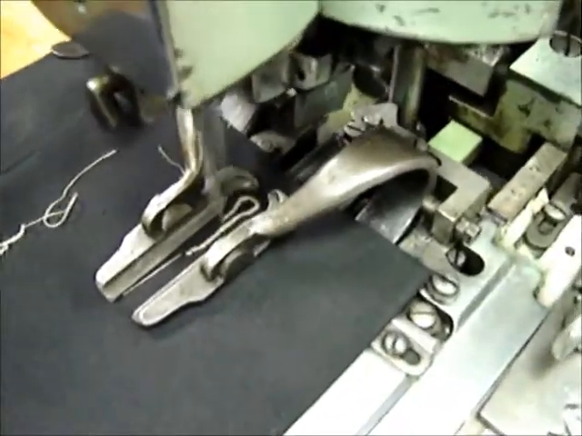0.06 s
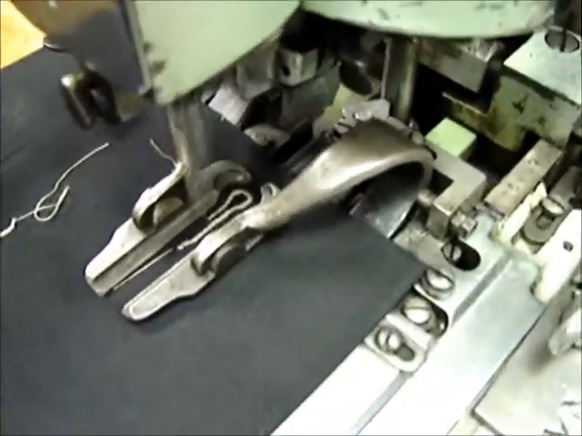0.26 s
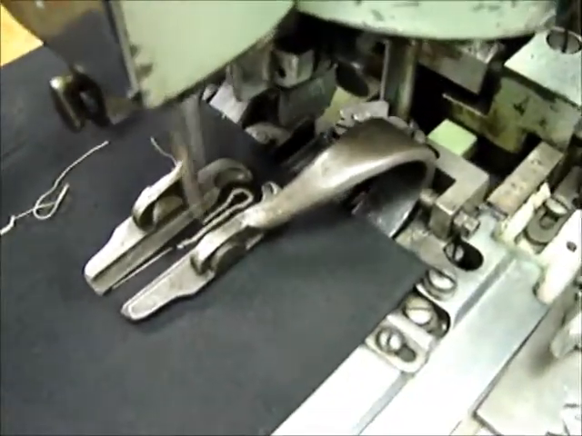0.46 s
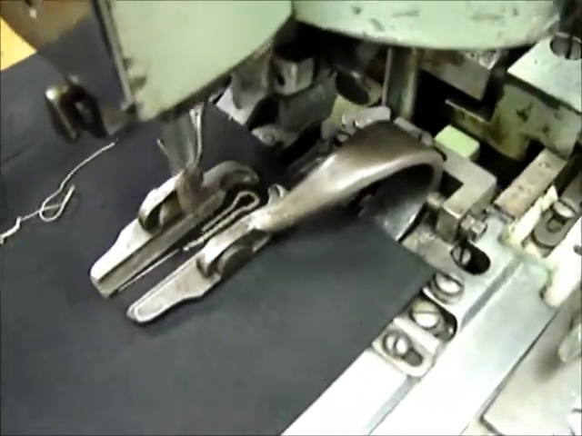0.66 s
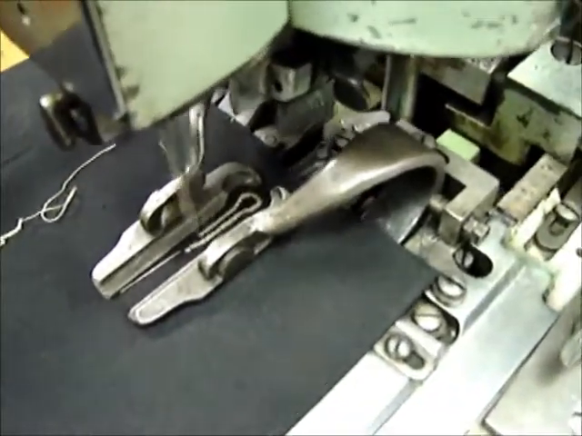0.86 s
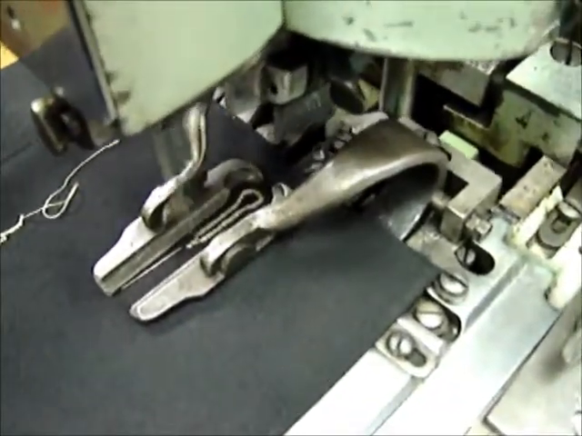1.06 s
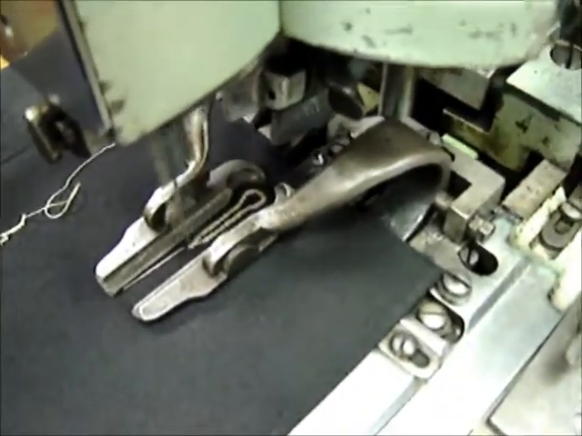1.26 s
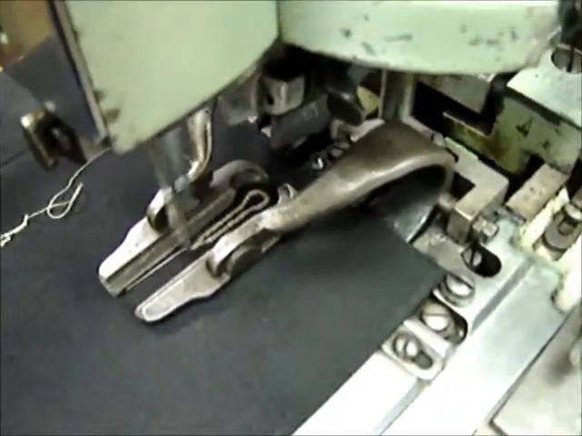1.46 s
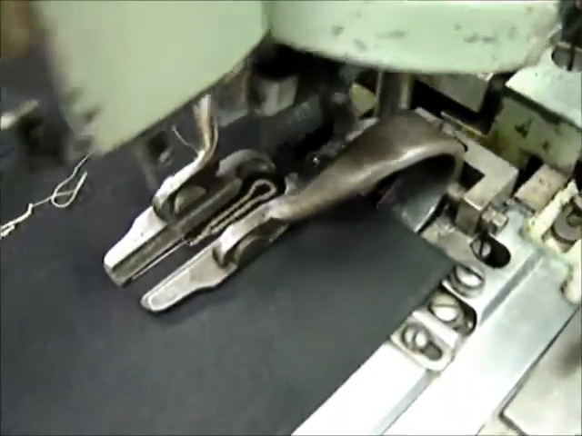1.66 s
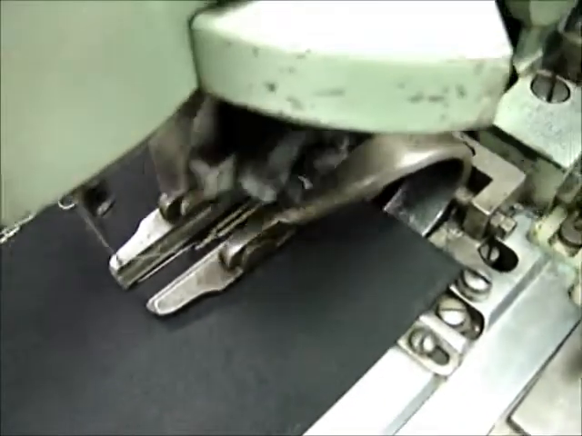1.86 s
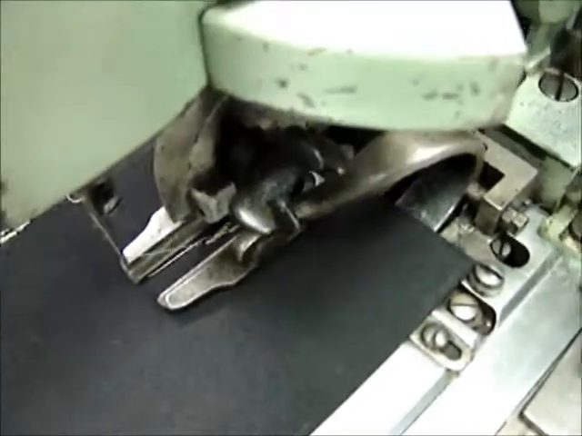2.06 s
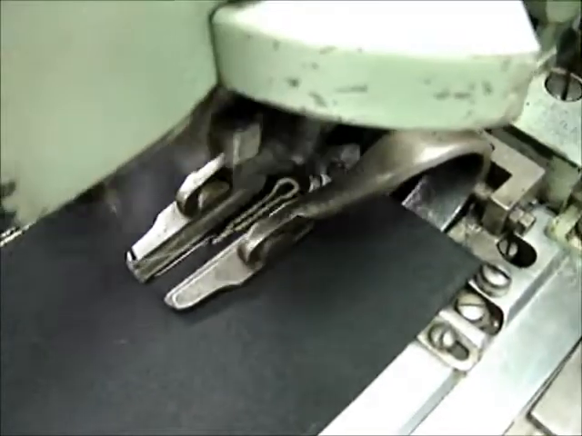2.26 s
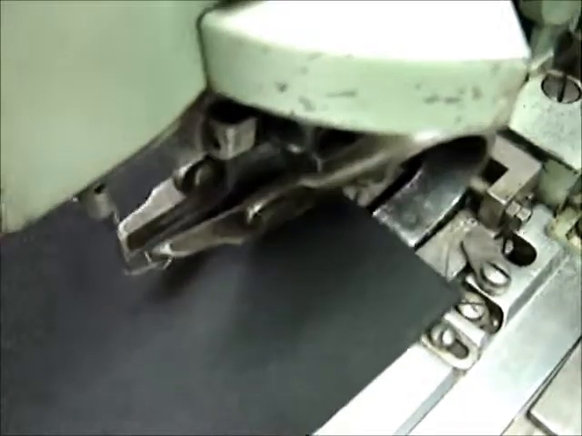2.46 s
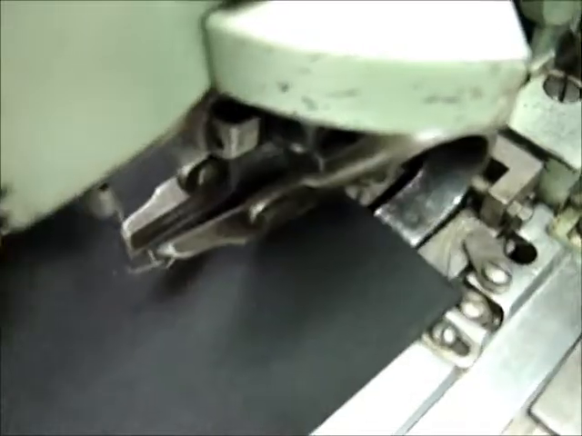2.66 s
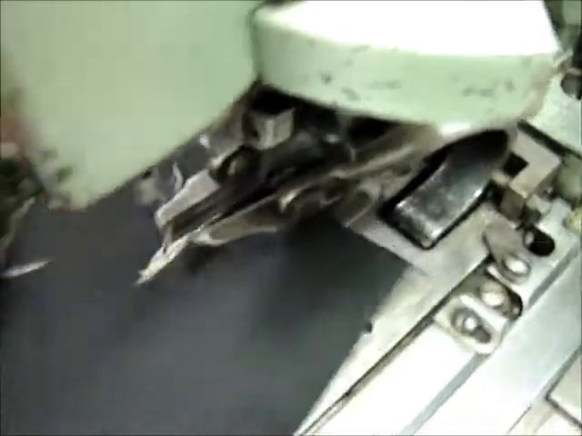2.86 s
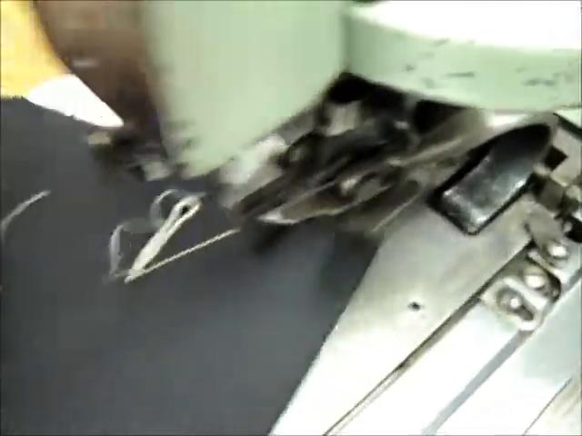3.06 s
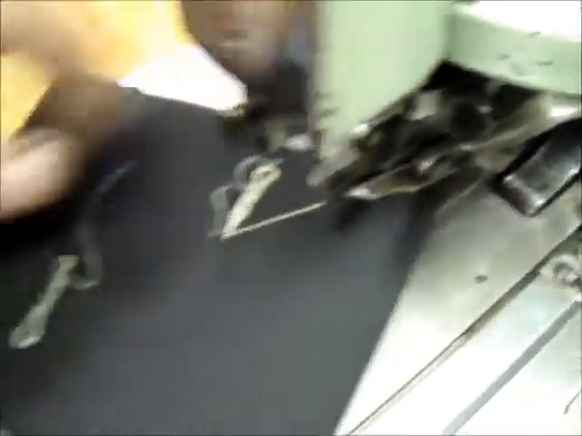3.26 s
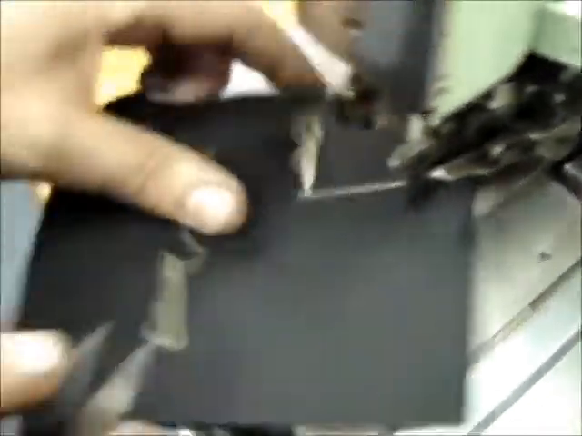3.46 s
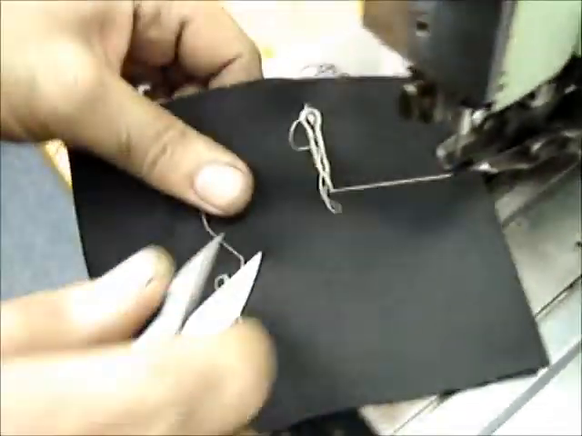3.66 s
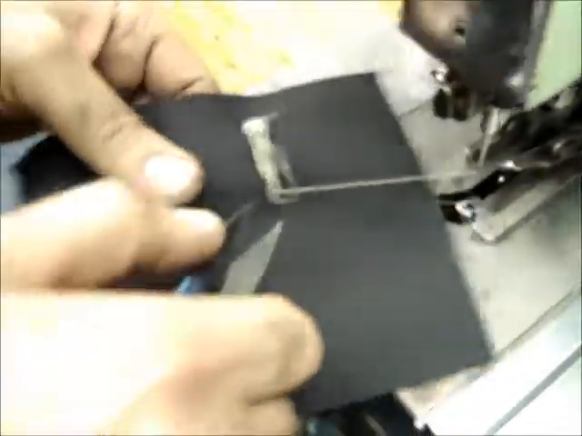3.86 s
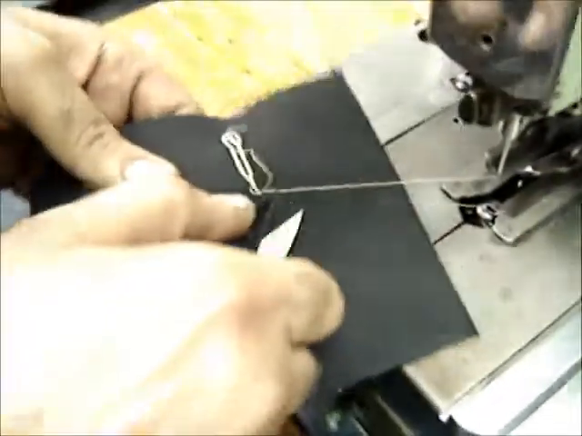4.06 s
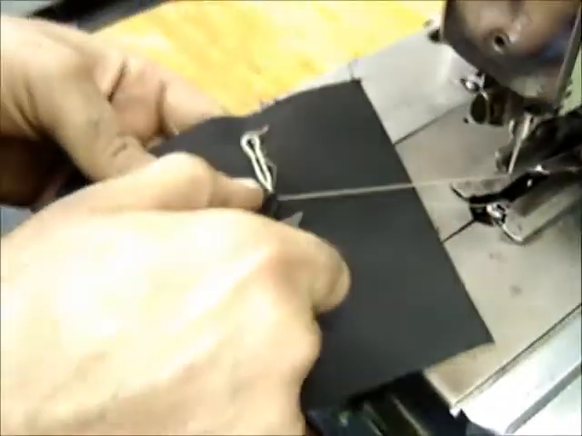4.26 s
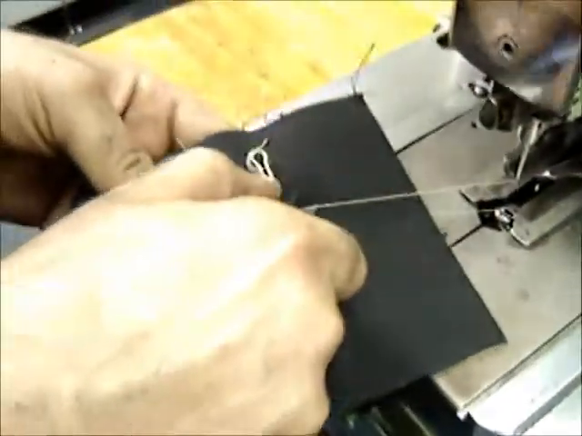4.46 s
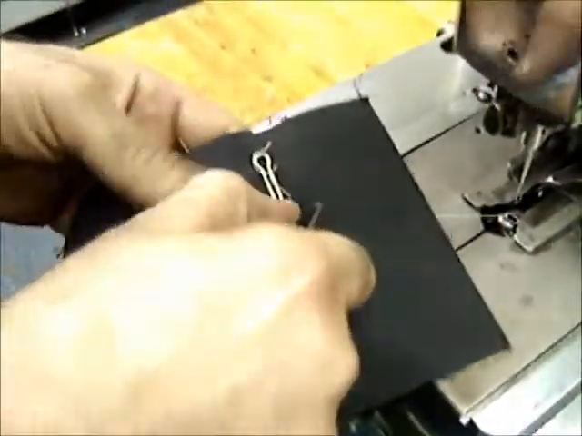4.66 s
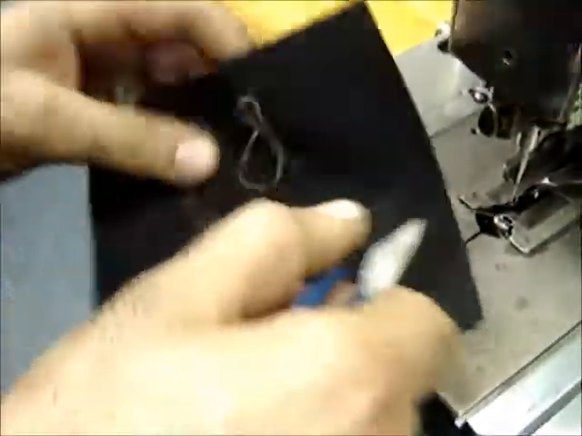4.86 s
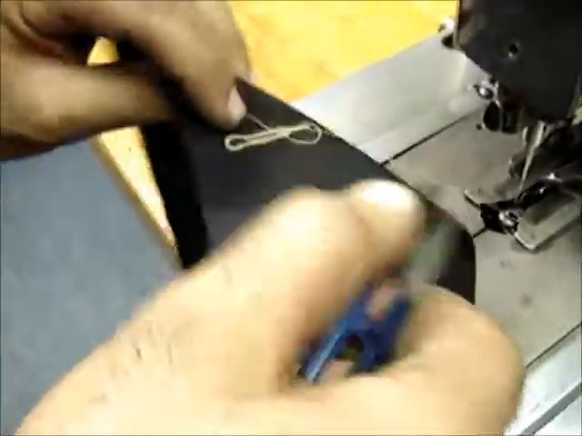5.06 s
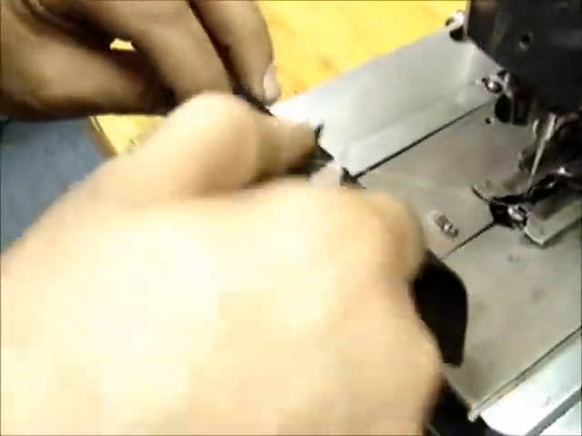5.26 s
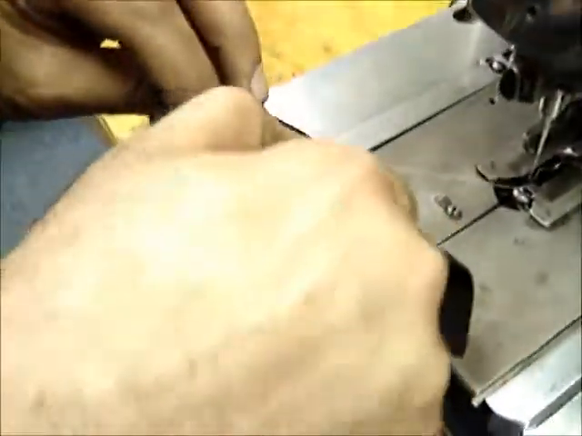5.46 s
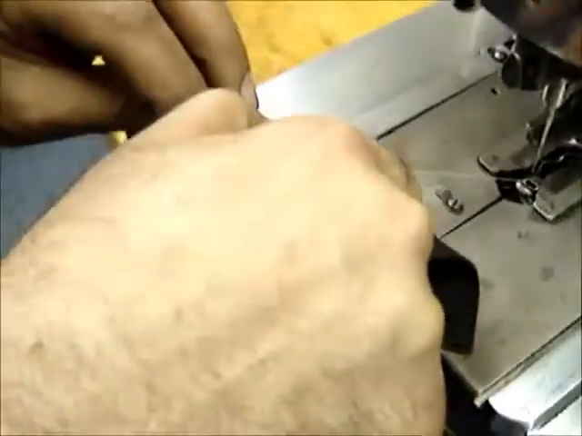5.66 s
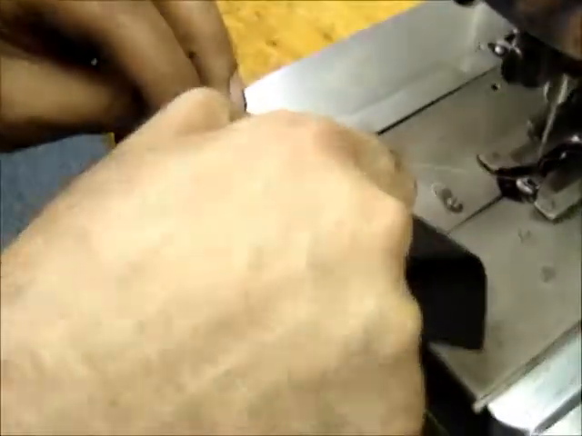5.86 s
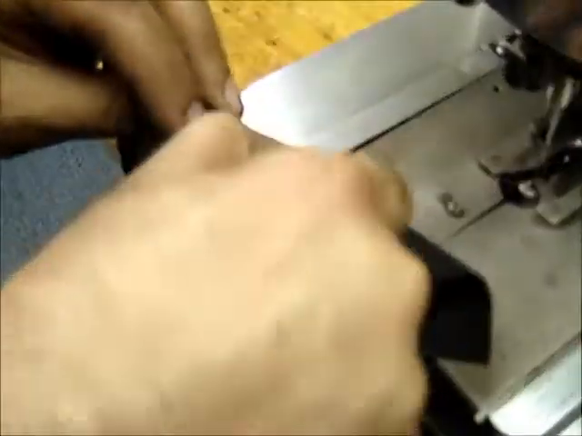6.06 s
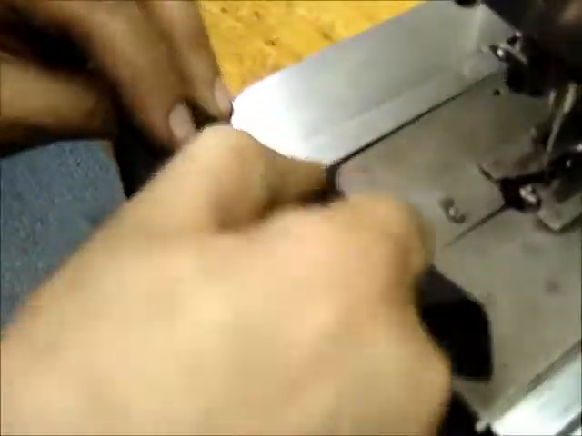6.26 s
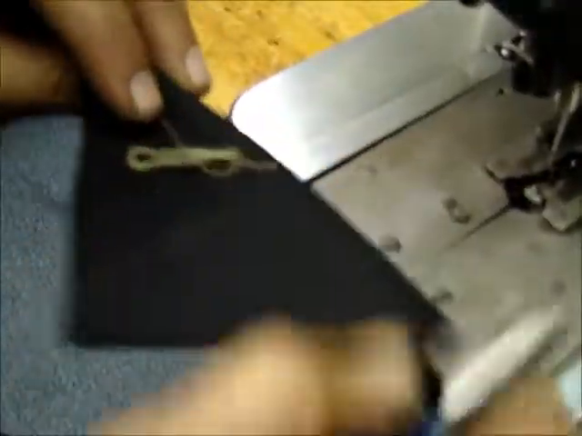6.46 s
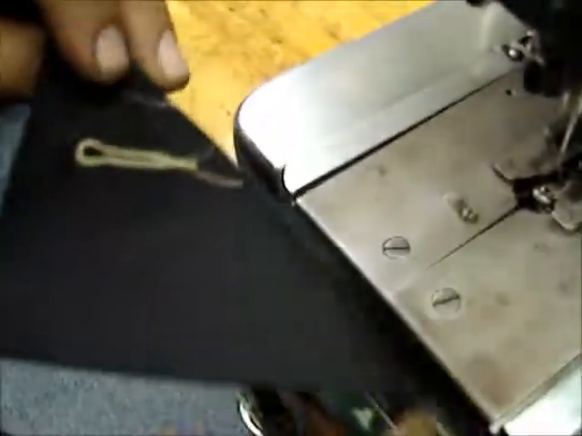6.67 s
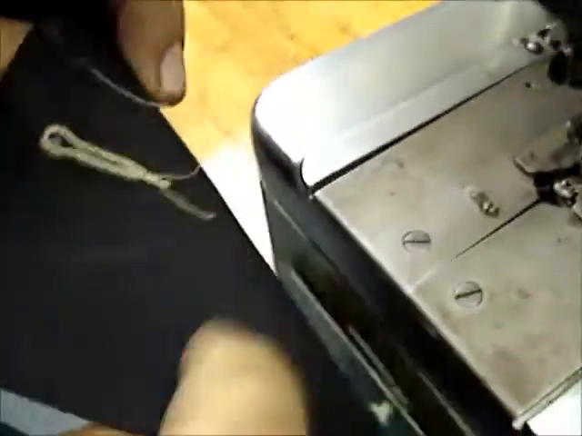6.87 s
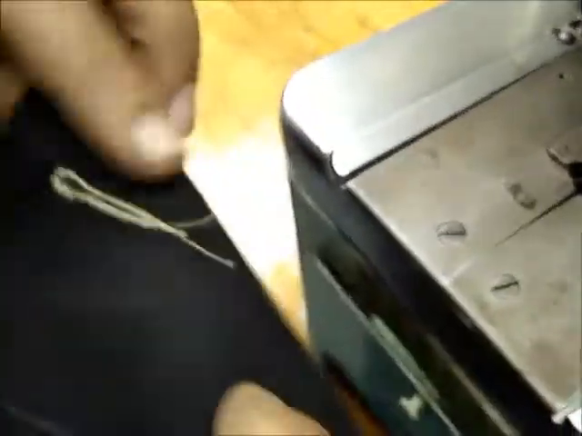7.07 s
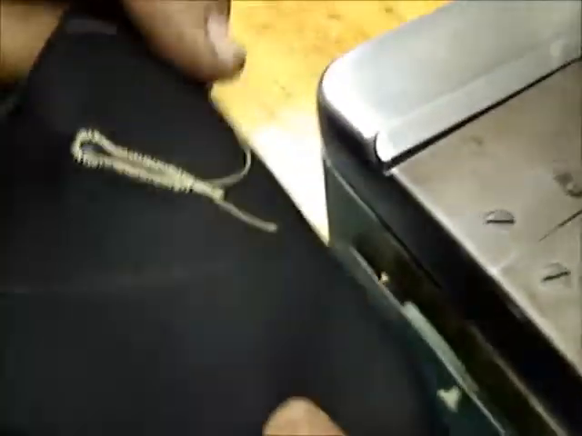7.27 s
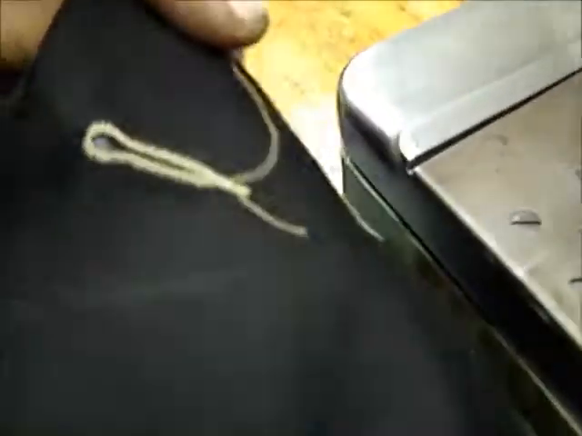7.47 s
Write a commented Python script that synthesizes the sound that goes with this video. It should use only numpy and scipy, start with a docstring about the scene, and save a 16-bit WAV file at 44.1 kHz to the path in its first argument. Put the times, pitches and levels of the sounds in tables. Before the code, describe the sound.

A sewing machine stitches with a fast metallic rattle, clunks and stops, leaving a motor hum and faint cloth handling.

```python
"""A buttonhole machine at work

The machine stitches, cuts the cloth and stops. Each stitch is a cluster of steel blows on its head;
then the feed gears whirr between the clunks of knife and latch. The idling motor, its belt and hands
busy with cloth remain, and an automatic volume control slowly brings them up."""
import sys
import numpy as np
from scipy import signal
from scipy.io import wavfile
from scipy.ndimage import uniform_filter1d

SR = 44100
rng = np.random.default_rng(int(sys.argv[2]) if len(sys.argv) > 2 else 0)


def wav_out(sig):
    """Save sig, one row per channel (or a flat mono array), as 16-bit PCM at SR to the path in sys.argv[1]."""
    wavfile.write(sys.argv[1], SR, np.round(np.clip(np.atleast_2d(sig).T, -1, 1) * 32767).astype(np.int16))


N = 331632

# tone colour of the machine's head: (frequency [Hz], level [dB])
HEAD_COLOUR = [(24, -74), (40, -32), (80, -15.5), (237, -16), (279, -11.5), (359, -12.5), (1020, -1),
               (1220, -11), (1370, -9), (2500, -6), (3620, -3), (4160, -9.5), (5740, -5.5), (10000, -8.5),
               (13000, -42), (22000, -120)]
# notes of the cast metal housing when struck: (pitch [Hz], level [dB], time to fade by 60 dB [s])
HOUSING_NOTES = [(664, 0, 0.034), (790, -6.5, 0.023), (1040, 7, 0.016), (1280, -6, 0.03),
                 (1630, -8.5, 0.021), (1895, -0.5, .025), (2180, 4, 0.018), (2420, -5, 0.034),
                 (2630, -6.5, 0.017), (3100, -7, 0.019), (3510, -6.5, 0.034), (5430, -11, .012)]
# tone colour of the idling machine: (frequency [Hz], level [dB])
IDLE_COLOUR = [(15, -99), (25, -40.5), (141, -12), (186, -13), (286, -15), (430, -11.5), (475, -16),
               (751, -14), (968, -18.5), (2180, -19), (2740, -23.5), (3270, -20.5), (3810, -24),
               (9510, -38.5), (10800, -42), (14000, -101), (22000, -120)]
# where the loose sheet-metal covers ring: (pitch [Hz], width [Hz], level [dB])
COVER_PEAKS = [(418, 54, -6.5), (618, 68, -1), (744, 14.7, 1.5), (1140, 44, -4.5), (1836, 36, -4),
               (2133, 63, -6.5), (2315, 150, -8.5), (2516, 83, -7.5), (3008, 57, -12), (3250, 60, -10),
               (3363, 83, -6.5), (3680, 14, -11), (4378, 110, -13.5), (4854, 93, -13.5), (5000, 110, -24),
               (5320, 180, -19)]


def gain_of(db):
    """Turns decibels into a volume factor."""
    return 10 ** (np.asarray(db) / 20)


def evened(x):
    """Scales a signal to an average power of 1."""
    return x / np.sqrt(np.mean(x ** 2) + 1e-20)


def body(colour, peaks, lo_hz, hi_hz, peaks_db=0, size=4096):
    """How an object answers one tap: its tone colour plus ringing peaks, between two frequencies."""
    hz = np.fft.rfftfreq(size, 1 / SR) + 1
    colour_hz, colour_db = np.transpose(colour)
    power = gain_of(2 * np.interp(np.log(hz), np.log(colour_hz), colour_db))
    for centre, width, db in peaks:
        power += gain_of(2 * (db + peaks_db)) / (1 + (2 * (hz - centre) / width) ** 2) ** 2
    power = power / (1 + (lo_hz / hz) ** 8) / (1 + (hz / hi_hz) ** 8)
    log_gain = np.log(power / power.max() + 1e-10) / 2
    mirrored = np.concatenate([log_gain, log_gain[-2:0:-1]])
    answer = np.fft.ifft(np.exp(np.conj(signal.hilbert(mirrored)))).real  # nothing sounds before the tap
    return answer / np.linalg.norm(answer)


def struck(notes):
    """The ring of a struck object: pure tones that die away."""
    t = np.arange(SR // 4) / SR
    ring = sum(gain_of(db - 60 * t / fade_s) * np.sin(2 * np.pi * hz * t) for hz, db, fade_s in notes)
    return ring / abs(ring).max()


def grit(spread_db, size):
    """Noise of many tiny contacts, a few of them hard; each grain lasts `size` samples."""
    hardness = np.repeat(rng.standard_normal(N // size + 1), size)[:N]
    return evened(rng.standard_normal(N) * gain_of(spread_db * hardness))


def bursts(times, levels_db, fades_s, rise_s):
    """Loudness curve of blows that each swell by 60 dB, then fade by 60 dB, in the given times."""
    power, t = np.zeros(N + SR), np.arange(-SR // 8, SR // 4) / SR
    for start, db, fade_s in zip(times, levels_db, fades_s * np.ones(len(times))):
        drop_db = 60 * np.where(t < 0, -t / rise_s, t / fade_s)
        power[round(start * SR):][:len(t)] += gain_of(2 * (db - drop_db))
    return np.sqrt(power[SR // 8:][:N])


def glide(times, levels_db):
    """Loudness curve that slides from point to point, silent before and after."""
    return gain_of(np.interp(np.arange(N) / SR, times, levels_db, left=-200, right=-200))


def through(drive, answer):
    """The sound of an object shaken by `drive`, given its answer to one tap."""
    return signal.oaconvolve(drive, answer)[:N]


def stitch_blows():
    """Every stitch repeats the same blows, each a little early or late, harder or softer."""
    # one row per stitch: (time [s], downstroke strength [dB], return stroke strength [dB])
    stitches = [(0.004, -19.5, -29), (0.0892, -22, -24.5), (0.173, -19.5, -20), (0.255, -17, -18),
                (0.3344, -17.5, -18), (0.4158, -18, -21), (0.501, -18, -20), (0.585, -19, -20.5),
                (0.668, -19.5, -19.5), (0.7528, -17.5, -21.5), (0.839, -19, -20), (0.9201, -19, -18.5),
                (1, -19, -16.5), (1.0798, -18.5, -21), (1.165, -20, -19.5), (1.247, -20, -23),
                (1.3347, -20.5, -20), (1.4195, -18.5, -18), (1.5, -17.5, -20.5), (1.585, -17.5, -16)]
    # blows of each stroke, added to its strength:
    # (delay [s], housing [dB], linking rods [dB], thread loopers [dB], springs [dB])
    downstroke = [(-.018, -23, -14.5, -6.5, 2.5), (-.007, -5.5, -8.5, -3, -10), (.001, -0.5, -5, -3, -0.5),
                  (.016, -13, -17, -2, 0)]
    return_stroke = [(.038, 0, -8.5, -3, -19)]
    blows = []
    for start, down_db, return_db in stitches:
        for strength_db, stroke in ((down_db, downstroke), (return_db, return_stroke)):
            blows += [[start + delay, *np.add(strength_db, parts_db)] for delay, *parts_db in stroke]
    blows = np.array(blows)
    scatter_s, scatter_db = 0.0015, 1.5
    chance = rng.standard_normal(blows.shape)
    times = abs(blows[:, 0] + scatter_s * chance[:, 0])
    levels_db = blows[:, 1:] + scatter_db * chance[:, 1:]
    heard = blows[:, 0] > 0
    return times[heard], levels_db[heard].T


def stitching():
    """Steel blows shake the housing and small parts, over chatter that dies after the last stitch."""
    # where the head rings: (pitch [Hz], width [Hz], level [dB])
    head_peaks = [(568, 230, -9.5), (1004, 84, -4.5), (1386, 100, -6), (2130, 310, -2.5), (3660, 290, -7),
                  (5600, 230, -6), (6300, 760, -5.5), (8080, 140, 3), (9360, 340, 1)]
    # chatter between blows: (housing [dB], linking rods [dB], thread loopers [dB], springs [dB])
    chatter_db = (-32.5, -32.5, -35.5, -82)
    # the same four parts: (lowest [Hz], highest [Hz], fade [s], rise [s])
    parts = [(250, 1820, 0.059, 0.056), (1640, 4170, 0.078, 0.044),
             (4500, 5800, 0.049, 0.05), (7050, 18000, 0.017, 0.021)]
    stop_s, rumble_db, strike_db = 1.76, -44, 3.5
    running = gain_of(-60 * np.maximum(np.arange(N) / SR - stop_s, 0) / 0.084)
    times, levels_db = stitch_blows()
    rumble = through(rng.standard_normal(N), body(HEAD_COLOUR, [], 30, 274))
    strikes = np.zeros(N)  # one hard contact within each blow
    strikes[np.round(times * SR).astype(int)] = gain_of(levels_db[0] + strike_db)
    out = gain_of(rumble_db) * running * rumble + through(strikes, struck(HOUSING_NOTES))
    for (lo_hz, hi_hz, fade_s, rise_s), blows_db, between_db in zip(parts, levels_db, chatter_db):
        drive = np.hypot(bursts(times, blows_db, fade_s, rise_s), gain_of(between_db) * running)
        out += through(drive * grit(2.0, size=24), body(HEAD_COLOUR, head_peaks, lo_hz, hi_hz))
    return out


def motor():
    """Steady tones throb with the load and waver a little, over the soft rush of motor and room."""
    # tones of the motor and the mains: (pitch [Hz])
    pitches = (120.1, 190.6, 240.2, 360.3, 430.8, 509, 571.9, 601.8, 762.5, 877.7)
    # for each tone: (relative level [dB], throb depth [dB])
    levels = [(-40.5, 0.3), (-29, 0.4), (-46.5, .4), (-44, -1), (-39, 4.5), (-45.5, 2), (-41.5, 1.5),
              (-50.5, -6.5), (-41.5, 1), (-46, 1)]
    hum_db, rush_db, pulley_hz = -48.5, -50, 3.85
    t, hum = np.arange(N) / SR, np.zeros(N)
    throb = np.cos(2 * np.pi * pulley_hz * (t - 0.13))  # a slow pulley loads the motor once a turn
    waver_hz = np.geomspace(0.4, 9, num=12)
    for hz, (db, depth_db) in zip(pitches, levels):
        phases = rng.random(13)
        waver = evened(sum(np.sin(2 * np.pi * (rate * t + p)) for rate, p in zip(waver_hz, phases)))
        hum += gain_of(db + depth_db * throb + 1.2 * waver) * np.sin(2 * np.pi * (hz * t + phases[-1]))
    rush = through(grit(1.93, size=400), body(IDLE_COLOUR, COVER_PEAKS, 23, 20000, -6, size=8192))
    return gain_of(hum_db) * evened(hum) + gain_of(rush_db) * rush


def covers():
    """The covers jingle once a shaft turn and knock as the belt joint passes. Now and then the belt joint or
    something loose knocks them harder."""
    # harder knocks, some as the belt joint passes, others from something loose: (time [s], level [dB])
    hard_knocks = [(3.673, -48), (3.94, -47), (4.332, -47), (4.637, -40.5), (4.975, -51), (5.89, -48),
                   (6.259, -42.5), (6.671, -41.5), (6.781, -40.5), (6.925, -45), (7.109, -46.5),
                   (7.437, -48), (7.494, -55)]
    shaft_hz, jingle_db = 27.94, -55
    belt_hz, belt_db, knock_fade_s, treble_db = 9.13, -48, 0.05, -12.5
    turns = np.arange(0.03, N / SR, 1 / shaft_hz)
    late, harder = rng.standard_normal((len(turns), 2)).T
    jingle = bursts(abs(turns + 0.004 * late), jingle_db + 1.4 * harder, fades_s=0.044, rise_s=0.075)
    laps = np.arange(0.099, N / SR, 1 / belt_hz)
    late, harder = rng.standard_normal((len(laps), 2)).T
    hard_times, hard_db = np.transpose(hard_knocks)
    times = np.concatenate([laps + 0.003 * late, hard_times])
    db = np.concatenate([belt_db + 1.5 * harder, hard_db])
    middle = np.hypot(jingle, bursts(times, db, knock_fade_s, rise_s=0.014)) * grit(2.0, size=20)
    treble = bursts(times, db + treble_db, knock_fade_s, rise_s=0.015) * grit(2.8, size=20)
    return (through(middle, body(IDLE_COLOUR, COVER_PEAKS, 1370, 4460, peaks_db=3))
            + through(treble, body(IDLE_COLOUR, COVER_PEAKS, 2700, 8600, peaks_db=3)))


def clunks():
    """A hard strike and a short rattle ring the housing, with a crack on top and a table thud below."""
    # knife, latches and brake: (time [s], crack [dB], rattle [dB], thud [dB], fade [s], strike [dB])
    hits = [(1.636, -10, -14, -8, 0.076, -22), (1.668, -27, -19.5, -41, 0.037, -33),
            (2.0885, -13.5, -9.5, -54, 0.022, 0), (2.207, -31, -28, -50, 0.033, -28),
            (2.242, -17, -46, -60, 0.06, -16), (2.2755, -18.5, -11.5, -42, 0.033, 0),
            (2.282, -29, -10.5, -41, 0.037, -18), (2.386, -13.5, -29, -27, 0.086, -8),
            (2.39, -25, -14, -13, 0.16, -11), (2.418, -15.5, -12.5, -20, 0.053, -18)]
    # low notes of the work table: (pitch [Hz], level [dB], time to fade by 60 dB [s])
    table_notes = [(203.6, 8, 0.07), (110, -10.5, 0.055), (285, 5, 0.12), (357, 0, 0.087),
                   (480, -13.5, .05)]
    times, crack_db, rattle_db, thud_db, fades_s, strike_db = np.transpose(hits)
    at = np.round(times * SR).astype(int)
    strike, push = np.zeros(N), np.zeros(N)
    strike[at], push[at] = gain_of(strike_db), gain_of(thud_db)
    cracking = bursts(times, crack_db, fades_s, rise_s=0.0099) * grit(2.4, size=16)
    crack = through(cracking, body(HEAD_COLOUR, [], 2400, 20000))
    housing = signal.sosfilt(signal.butter(3, 520, "high", fs=SR, output="sos"), struck(HOUSING_NOTES))
    rattling = bursts(times, rattle_db, fades_s, rise_s=0.01) * grit(1.5, size=16)
    rattle = through(rattling, housing / np.linalg.norm(housing))
    soft = np.hanning(round(0.0032 * SR))  # the table gets a soft push, not a sharp tap
    thud = through(through(push, soft / soft.sum()), struck(table_notes))
    return through(strike, housing) + crack + rattle + thud


def feed_gears():
    """Gear teeth rub and ring their wheels; the slide scrapes at a higher pitch."""
    # gear ring, growing with the load before each latch lets go: (time [s], level [dB])
    load = [(1.65, -51), (1.68, -27), (1.76, -34), (1.8, -25), (1.9, -24.5), (2.0, -27), (2.08, -22),
            (2.11, -30), (2.2, -24.5), (2.26, -21.5), (2.3, -25), (2.37, -22), (2.43, -43), (2.46, -65)]
    # tone colour of the gears: (frequency [Hz], level [dB])
    colour = [(35, -71), (60, -21.5), (179, -24.5), (236, -24.5), (817, -14), (1060, -0.5), (1200, -13.5),
              (1310, -3), (1660, -13.5), (2600, -2.5), (3290, -14.5), (4930, -17.5), (10000, -22.5),
              (13000, -36), (22000, -120)]
    # where the gears ring: (pitch [Hz], width [Hz], level [dB])
    peaks = [(650, 90, -9), (1030, 60, -1), (1300, 40, 1), (1800, 60, -10), (2190, 60, 0), (2370, 50, -4),
             (2625, 60, 0), (3600, 80, -16), (4220, 90, -13), (4980, 300, -15)]
    times, ring_db = np.transpose(load)
    ring = glide(times, ring_db)
    scrape = glide(times, -27 + 0.65 * (ring_db + 21.5))  # follows the ring, but changes less
    gears = body(colour, peaks, 40, 2900, peaks_db=-1)
    wheels = np.zeros(N)
    for band_hz in ((40, 1150), (1150, 1700), (1700, 2450), (2450, 3200)):
        drift = evened(uniform_filter1d(rng.standard_normal(N), size=2000))
        swell = gain_of(2.2 * drift)  # each wheel swells by itself
        wheel = signal.sosfilt(signal.butter(3, band_hz, "band", fs=SR, output="sos"), gears)
        wheels += through(ring * swell * grit(4.1, size=40), wheel)
    return wheels + through(scrape * grit(2.4, size=40), body(colour, peaks, 3650, 20000, peaks_db=4))


def squeaks():
    """Steel sticks and slips on steel: a short whistle, with a weak tone an octave above."""
    # each squeak: (time [s], length [s], pitch [Hz], level [dB])
    slips = [(2.157, 0.016, 3850, -11.5), (2.194, 0.013, 4240, -25.5)]
    out = np.zeros(N)
    for start, length, hz, db in slips:
        t = np.arange(round((length + 0.03) * SR)) / SR
        phase = 2 * np.pi * hz * t
        tone = np.sin(phase) + gain_of(-18) * np.sin(2 * phase)
        shape = np.minimum(t / 0.0039, 1) * gain_of(-60 * np.maximum(t - length, 0) / 0.05)
        out[round(start * SR):][:len(t)] += gain_of(db) * tone * shape
    return out


def crunches():
    """Cloth, thread and scissors crunch: each sound starts quickly, grinds on briefly and dies."""
    # each crunch: (time [s], length [s], level [dB])
    moves = [(2.59, 0.038, -45), (2.703, 0.02, -42.5), (3.019, 0.033, -45), (4.459, 0.026, -41),
             (4.564, .045, -45.5), (6.321, 0.033, -43), (6.424, 0.033, -42.5)]
    # tone colour of a crunch: (frequency [Hz], level [dB])
    colour = [(800, 0.5), (1700, 1.5), (2200, 5), (2750, -4), (3350, 6), (4000, -7), (5200, 2.5),
              (5800, -10), (9000, -16.5)]
    drive = np.zeros(N)
    for start, length, db in moves:
        t = np.arange(round((length + 0.05) * SR)) / SR
        drop_db = 5 * t / length + 60 * np.maximum(t - length, 0) / 0.076
        drive[round(start * SR):][:len(t)] += gain_of(db - drop_db) * np.minimum(t / 0.0071, 1)
    return through(drive * grit(2.3, size=30), body(colour, [], 700, 23000))


def cloth():
    """Cloth and thread are pulled over the plate with a thin, dry rasp."""
    # strength of the pull: (time [s], level [dB])
    pull = [(4.3, -72), (5.0, -71), (5.8, -64.5), (6.25, -56), (6.5, -69)]
    rubbing = glide(*np.transpose(pull)) * grit(1.6, size=60)
    return through(rubbing, body(IDLE_COLOUR, COVER_PEAKS, 4600, 6100))


def scene():
    """The machine's head close by, with a small room's short echo, plus the quieter sounds around it."""
    echo_s, echo_db = 0.36, -20
    near = stitching() + feed_gears() + clunks() + squeaks()
    # the microphone's low cut thins the deep bass of the close sounds
    near = signal.sosfilt(signal.butter(2, 85, "high", fs=SR, output="sos"), near)
    tail = rng.standard_normal(SR // 2) * gain_of(-60 * np.arange(SR // 2) / SR / echo_s)
    walls = body([(100, 9.5), (1500, -3.0), (9000, -33.5)], [], 30, 20000)
    echo = through(near, through(tail, walls)[:SR // 2]) / np.linalg.norm(tail)
    return (near + gain_of(echo_db) * echo + motor() + covers() + cloth() + crunches())[None]


def record(dry):
    """Automatic volume control: it turns down fast under loud sound and creeps back ever more slowly."""
    average_samples, recovery_s = 4000, 2.282
    ceiling, hiss_db, treble_limit_hz = 0.95, -57, 10080
    power, step = dry[0] ** 2, 1 / average_samples
    average, _ = signal.lfilter([step], [1, step - 1], power, zi=[power[:average_samples].mean()])
    excess_db = np.maximum(10 * np.log10(average) + 48, 0.1)  # how far the level is above -48 dB
    creep = np.arange(N) / SR / recovery_s
    held_db = np.exp(np.maximum.accumulate(np.log(excess_db) + creep) - creep)  # peaks sink slowly
    out = dry * gain_of(26 - 0.94 * held_db)
    out = out / (1 + (out / ceiling) ** 6) ** (1 / 6)  # the hardest blows round off
    out = out + gain_of(hiss_db) * rng.standard_normal(N)  # hiss of the electronics
    treble_cut = signal.firwin(767, treble_limit_hz, window=("kaiser", 9), fs=SR)
    return signal.oaconvolve(out, treble_cut[None], "same")


dry = scene()
out = record(dry)
wav_out(out)
```